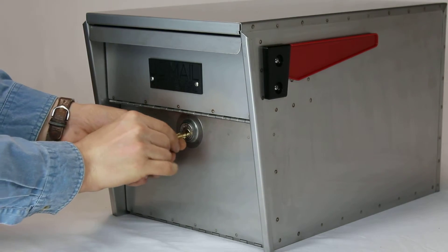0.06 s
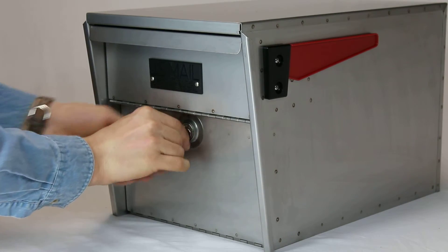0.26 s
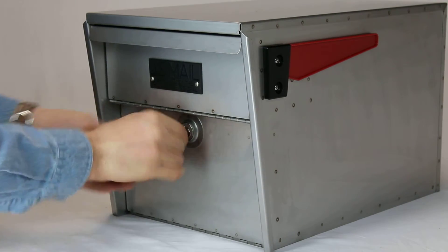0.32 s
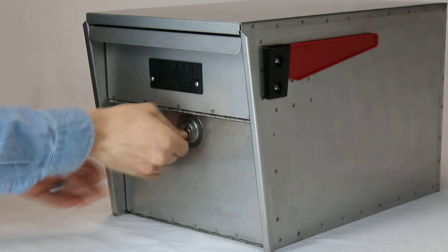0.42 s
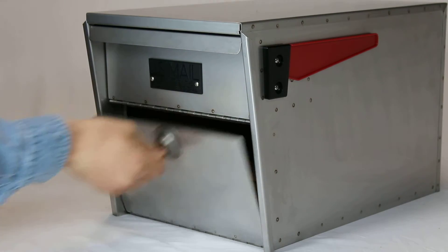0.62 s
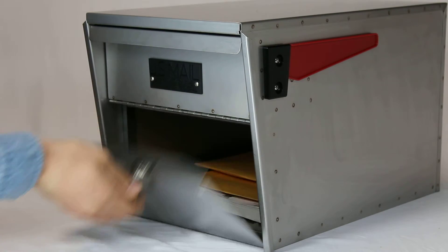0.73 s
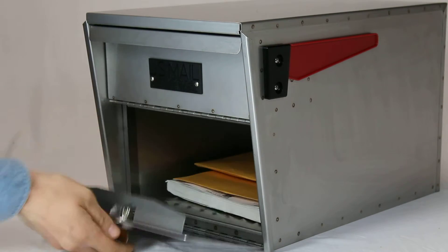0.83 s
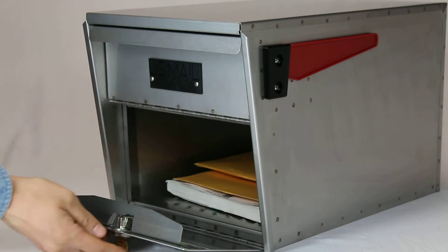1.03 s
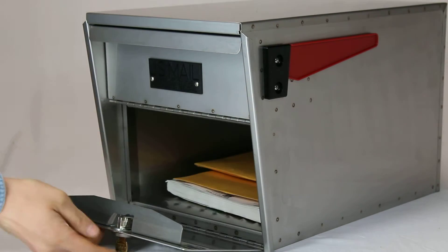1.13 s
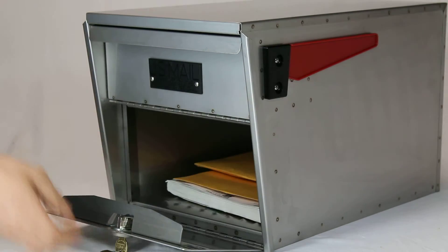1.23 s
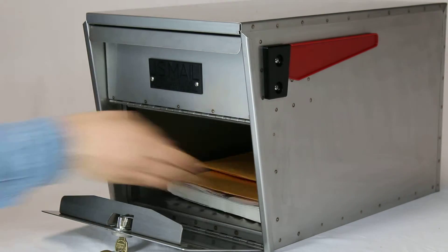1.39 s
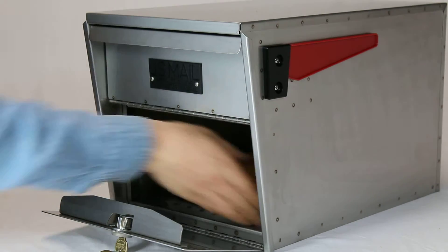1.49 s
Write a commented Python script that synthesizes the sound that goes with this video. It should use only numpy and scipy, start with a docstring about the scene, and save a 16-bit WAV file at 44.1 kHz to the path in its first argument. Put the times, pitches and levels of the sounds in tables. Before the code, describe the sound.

Metal mailbox unlocking with clicks and a boom, its door dropping open with a clunk.

```python
"""A room with a low hum, the microphone close to a sheet-metal mailbox. A key seats and turns:
pins tick, the cam scrapes and lets go, and the thin panels of the box boom and ring.
The door swings down on a rubbing hinge and clunks on its stop, shaking the table beneath.
The hanging keys jingle and knock against the door, and a sleeve brushes into the opening."""
import sys
import numpy as np
from scipy import signal
from scipy.fft import rfft, irfft, next_fast_len
from scipy.io import wavfile

SR = 44100
rng = np.random.default_rng(int(sys.argv[2]) if len(sys.argv) > 2 else 0)


def pcm_store(signal):
    """Save signal as 16-bit PCM."""
    levels = np.round(np.clip(np.atleast_2d(signal), -1, 1) * 32767)
    wavfile.write(sys.argv[1], SR, levels.astype(np.int16).T)


N = 68355
T = np.arange(N) / SR
CRACK_S, CONTACT_S = 0.002, 0.0013  # decay of a metal crack; rise of a ring after hard contact


def undb(db):
    """Decibels to gain."""
    return 10 ** (np.asarray(db) / 20)


def along(points, hz):
    """Read (pitch_hz, value) points on a log-frequency axis."""
    pitches, values = np.array(points, float).T
    return np.interp(np.log(np.maximum(hz, 1)), np.log(pitches), values)


def fader(points):
    """Gain over time from (time_s, level_db) points, silent before the first."""
    times, db = np.array(points, float).T
    return undb(np.interp(T, times, db)) * (T >= times[0])


def colour(x, points):
    """Causal filter through (pitch_hz, gain_db) points."""
    size = 2 * next_fast_len(N)
    hz = np.arange(size // 2 + 1) * SR / size
    cepstrum = irfft(np.log(undb(along(points, hz))))
    cepstrum[1:size // 2] *= 2  # fold to minimum phase
    cepstrum[size // 2 + 1:] = 0
    return irfft(rfft(x, size) * np.exp(rfft(cepstrum)))[:N]


def at(start_s, x):
    """Delay a sound to its start."""
    return np.concatenate([np.zeros(int(start_s * SR)), x])[:N]


def fade(t60):
    """Decay by 60 dB in t60 seconds."""
    return np.exp(-np.log(1000) * T / t60)


def noise():
    """White noise of unit level."""
    return rng.standard_normal(N)


def ring(modes, swell_s, tilt_db=0):
    """Decaying modes that build up over swell_s, tilted by tilt_db per octave from the first."""
    rise = np.sin(np.pi / 2 * np.minimum(T / swell_s, 1))
    out = 0
    for hz, db, t60 in modes:
        gain = undb(db + tilt_db * np.log2(hz / modes[0][0]))
        out += gain * fade(t60) * np.sin(2 * np.pi * hz * T)
    return rise * out


def thumps(pushes, modes, focus_db_per_octave=10):
    """Pushes into one body; the spot that is pushed favours the modes near one pitch."""
    out = 0
    for start_s, level_db, swell_s, pitch_hz in pushes:
        favoured = [(hz, db - focus_db_per_octave * abs(np.log2(hz / pitch_hz)), t60)
                    for hz, db, t60 in modes]
        out += undb(level_db) * at(start_s, ring(favoured, swell_s))
    return out


def stick_slip(slips_per_s):
    """Friction: tiny clicks at random times, each with a short tail."""
    slips = (rng.random(N) < slips_per_s / SR) * np.sign(noise())
    click = noise() * (np.exp(-T / CRACK_S) + undb(-10.5) * fade(t60=0.18))
    friction = signal.fftconvolve(slips, click)[:N]
    return friction / friction.std()


# Hum in the room: pitch_hz, level_db
HUM_TONES = [(45.6, -51), (91.2, -44)]
# Air around the microphone: pitch_hz, gain_db
AIR_COLOUR = [(25, -24.5), (115, -25), (190, -36), (500, -33.5), (1000, -47.5), (2500, -47), (5000, -51.5),
              (9000, -56), (12000, -65)]
def room_tone():
    """A steady low hum and soft air noise lie behind everything."""
    hum = sum(undb(db) * np.sin(2 * np.pi * (hz * T + rng.random())) for hz, db in HUM_TONES)
    return np.sqrt(2) * hum + colour(noise(), AIR_COLOUR)


# Cloth entering the opening: time_s, level_db
SLEEVE_LEVELS = [(1.38, -70), (1.47, -51.5), (1.55, -45)]
# Its hiss: pitch_hz, gain_db
CLOTH_COLOUR = [(200, -7), (1000, 10), (3000, 1), (8000, -5.5), (11000, -10), (15000, -38)]
def sleeve():
    """Cloth brushes into the box with a faint, growing hiss."""
    return colour(noise() * fader(SLEEVE_LEVELS), CLOTH_COLOUR)


# Jolt into the table: start_s, level_db, swell_s, pitch_hz
TABLE_JOLTS = [(0.895, -24.5, 0.0062, 30)]
# The table's rumble: pitch_hz, level_db, t60_s
TABLE_RING = [(27, -11, .4), (42, -6.5, 0.95), (63, 7, 0.24)]
def table_shudder():
    """The table shudders in its deep modes under the door."""
    return thumps(TABLE_JOLTS, TABLE_RING)


# Rub of the hinge: time_s, level_db
HINGE_LEVELS = [(.76, -51), (.82, -42.5), (.86, -38), (.95, -39), (1.0, -46.5), (1.04, -82)]
# Its tone: pitch_hz, gain_db
RUB_COLOUR = [(60, -18), (250, 8.5), (900, 8), (1800, 3.5), (4500, -9), (9000, -13), (15000, -39)]
def hinge():
    """The hinge sticks and slips as the door swings down."""
    return colour(stick_slip(slips_per_s=820) * fader(HINGE_LEVELS), RUB_COLOUR)


# Faint tone of the open door: time_s, pitch_hz, level_db
FLEX_GLIDE = [(.92, 675, -62), (1.12, 771, -46), (1.28, 737, -56), (1.5, 737, -65)]
def flexing_door():
    """One thin ring of the door slides in pitch as the sheet bends."""
    times, hz, db = np.array(FLEX_GLIDE, float).T
    phase = 2 * np.pi * np.cumsum(np.interp(T, times, hz)) / SR
    return fader(list(zip(times, db))) * np.sin(phase)


# The door landing and settling: start_s, level_db, swell_s, pitch_hz
DOOR_LANDINGS = [(0.8690, -19.5, 0.0088, 375), (0.912, -26.5, 0.016, 112), (1.078, -23, 0.0073, 238)]
# The door's own ring: pitch_hz, level_db, t60_s
DOOR_RING = [(112, 6.5, 0.27), (140, -3, 0.97), (238, -5, 0.33), (361.8, 4.5, 0.15), (419, -1, 0.206),
             (579, -5, 0.18), (993, -2, 0.24), (1092, -1, 0.18), (1327, 8.5, 0.1)]
def door_stop():
    """The door clunks on its stop; its broad edge drives only a narrow range of modes."""
    return thumps(DOOR_LANDINGS, DOOR_RING, focus_db_per_octave=17)


# The key bunch hitting the door: start_s, level_db
KEY_KNOCKS = [(1.011, -11), (1.237, -16.5)]
# Its dull clack: pitch_hz, gain_db
CLACK_COLOUR = [(130, -14), (260, -5.5), (450, 0.5), (700, -6), (950, 3.5), (1320, -3), (1600, -2),
                (2300, -8.5), (2950, -15.5), (3600, -28), (8000, -34), (15000, -52)]
def knocking_keys():
    """The hanging bunch knocks on the door, which rings under each knock."""
    envelope = undb(-4.5) * np.exp(-T / 0.0039) + undb(-4) * fade(t60=0.35)  # crack, then tail
    clacks = sum(undb(db) * at(start_s, noise() * envelope) for start_s, db in KEY_KNOCKS)
    ring_db, favoured_hz = -12, 650
    pushes = [(start_s, db + ring_db, CONTACT_S, favoured_hz) for start_s, db in KEY_KNOCKS]
    return colour(clacks, CLACK_COLOUR) + thumps(pushes, DOOR_RING)


# Jingles of the bunch: start_s, level_db, tilt_db_per_octave, t60_factor
KEY_JINGLES = [(0.797, -46.5, 1, .8), (0.881, -48.5, -17, 2.2), (1.015, -57, 18, 1.1),
               (1.24, -34.5, -79, .6)]
# One key's ring: pitch_hz, level_db, base_t60_s
KEY_RING = [(7960, -8, 0.12), (8340, 1, 0.2), (9460, -6, 0.39), (11675, -4.5, 0.14), (14705, -6, 0.17)]
def jingling_keys():
    """A ringing key beats against a quieter one, slightly out of tune with it."""
    swell_s, detune_hz, twin_db = 0.009, (17.4, 54), -15
    out = 0
    for start_s, level_db, tilt_db, t60_factor in KEY_JINGLES:
        key = [(hz, db, t60 * t60_factor) for hz, db, t60 in KEY_RING]
        twin = [(hz + rng.uniform(*detune_hz), db + twin_db, t60) for hz, db, t60 in key]
        pair = ring(key, swell_s, tilt_db) - ring(twin, swell_s, tilt_db)
        out += undb(level_db) * at(start_s, pair)
    return out


# Ticks of pins and hinge: start_s, level_db, low_cut_hz
SMALL_TICKS = [(0.0768, -31, 7040), (0.1090, -28, 1500), (0.1202, -25, 5000), (0.1745, -28.5, 7400),
               (0.1914, -26, 5000), (0.207, -29.5, 7400), (0.8370, -40, 7200), (0.8725, -38, 3940),
               (0.906, -30, 8000), (0.962, -42, 3500), (1.2406, -40, 5000)]
# Small metal parts at close range: pitch_hz, gain_db
PIN_COLOUR = [(2000, -3), (3200, 6.5), (5500, -6.5), (8000, 3.5), (10500, -5), (12000, -8.5), (15000, -15)]
def ticks():
    """Small hard parts snap home, each with a sharp peak and a brief tail."""
    peak_s = 0.00056
    envelope = T / peak_s * np.exp(1 - T / peak_s) + undb(-8) * fade(t60=0.1)
    out = 0
    for start_s, level_db, low_cut_hz in SMALL_TICKS:
        low_cut = signal.butter(2, low_cut_hz, "high", fs=SR, output="sos")
        tick = signal.sosfilt(low_cut, np.sign(noise()) * envelope)
        out += undb(level_db) * at(start_s, tick)
    return colour(out, PIN_COLOUR)


# The cam dragging on the frame: time_s, level_db
CAM_LEVELS = [(.10, -30.5), (.17, -21.5), (.21, -16.5), (.232, -8.5), (.255, -5), (.29, -15), (.32, -25),
              (.36, -44)]
# Its rasp: pitch_hz, gain_db
CAM_COLOUR = [(100, -53.5), (200, 0.5), (450, 5.5), (600, -6), (1400, -8.5), (2700, -10.5), (4300, -22.5),
              (6000, -21.5), (9000, -37), (15000, -45)]
# The key grating on the pins: time_s, level_db
GRIT_LEVELS = [(.13, -51), (.18, -48), (.21, -34.5), (.243, -27), (.256, -33.5), (.28, -76)]
# The cam's chirp, then the latch's ping: pitch_hz, level_db, t60_s
SQUEAK_MODES = [(5840, -0.29, 0.056), (5930, -1.8, 0.07)]
LATCH_MODES = [(854, -3, 0.44), (3500, -15, 0.066)]
def turning_lock():
    """The key grates in the barrel, the cam drags and chirps as it bites, and the latch snaps free."""
    grit = colour(stick_slip(slips_per_s=170) * fader(GRIT_LEVELS), PIN_COLOUR)
    cam = colour(stick_slip(slips_per_s=820) * fader(CAM_LEVELS), CAM_COLOUR)
    squeak = undb(-29.5) * at(0.2215, ring(SQUEAK_MODES, CONTACT_S))
    latch = undb(-33) * at(0.467, ring(LATCH_MODES, CONTACT_S))
    return grit + cam + squeak + latch


# Pushes that flex the box: start_s, level_db, swell_s, pitch_hz
BOX_PUSHES = [(0.022, -18, 0.05, 116), (0.208, -11, 0.061, 172), (0.256, -5, 0.039, 117),
              (0.475, -26.5, 0.029, 118)]
# Its boom from close by: pitch_hz, level_db, t60_s
BOX_RING = [(121, 4.5, 0.25), (160, 1, 0.15), (275, -3.5, 0.22), (310, 2.5, 0.2), (456.7, 10, 0.2)]
def booming_box():
    """The box flexes and booms in its low modes as the key seats and turns."""
    return thumps(BOX_PUSHES, BOX_RING)


# Decay of the rattle in the box: pitch_hz, t60_s
RATTLE_DECAY = [(300, 0.85), (1000, 0.54), (2800, 0.26), (6000, 0.19), (13000, 0.085)]
def rattle():
    """Countless overlapping modes; the higher half-octave bands die away sooner."""
    spectrum, hz = rfft(noise()), np.arange(N // 2 + 1) * SR / N
    bands = np.round(2 * np.log2(np.clip(hz, 180, 16000)))
    return sum(irfft(spectrum * (bands == band), N) * fade(along(RATTLE_DECAY, 2 ** (band / 2)))
               for band in np.unique(bands))


# Bands that shape each blow: pitch_hz
BANDS_HZ = (400, 900, 1500, 3200, 5000, 9000, 13000)
# Key, cam, latch and door striking the box: start_s, crack_db, ring_db, then gain_db for each band
METAL_BLOWS = [(0.02, 8, -37, -9.5, -30, -24, -26, -29, -33, -46),
               (0.2460, 11.5, -26, -5.5, -11, -10.5, -17.5, -34.5, -27.5, -43),
               (0.4670, 11.5, -38.5, -19, -17, -25.5, -20.5, -37.5, -38, -50),
               (0.6800, -17, -71, -22.5, -34, -36, -37.5, -43, -54, -58),
               (0.88, 8, -45, -12.5, -23.5, -26.5, -26, -29.5, -33.5, -54),
               (1.079, 4, -60, -18.5, -24, -25.5, -30.5, -36.5, -44, -56)]
# Main modes of the panels: pitch_hz, level_db, t60_s
PANEL_RING = [(181, -25, 0.72), (268.4, -2.5, 1.3), (309.2, 4, 0.21), (356.3, -1, 1.84), (442, 1, 0.7),
              (648, -7, 0.99), (662, -11, 2.2), (755.4, -13.5, 1.34), (807, -9, 1.14), (873, -16, 0.47)]
# Wash of lesser panel modes: pitch_hz, gain_db
PANEL_SHIMMER = [(190, -21), (300, 4.5), (500, -7), (750, 8.5), (1100, 2), (1800, -7.5), (3000, -15),
                 (6000, -55)]
def metal_blows():
    """Metal on metal: a bright crack, a rattling tail, and the long ring of the panels."""
    panels = sum(ring([(hz, db, t60)], swell_s=0.16 * t60) for hz, db, t60 in PANEL_RING)
    out = 0
    for start_s, crack_db, ring_db, *band_db in METAL_BLOWS:
        crack = colour(noise() * np.exp(-T / CRACK_S), [(1200, -32.5), (3200, 0.5)])
        bass = [(50, band_db[0] - 77), (110, band_db[0] + 3), (260, band_db[0] - 4)]
        hit = colour(undb(crack_db) * crack + rattle(), bass + list(zip(BANDS_HZ, band_db)))
        shimmer = colour(noise() * fade(t60=1.66), PANEL_SHIMMER)
        out += at(start_s, hit + undb(ring_db) * (panels + shimmer))
    return out


# Resonances of the thin sheet: pitch_hz, gain_db, t60_s
SHEET_RESONANCES = [(747, -1.5, 0.066), (1038, -3.5, 0.19), (1389, -1.5, 0.14), (1825, 2.5, 0.26),
                    (2620, 4.5, 0.47), (2805, 4.5, 0.15)]
def resonating_sheet(drive):
    """The thin sheet rings in answer to the metal sounds that drive it."""
    response = 0
    for hz, db, t60 in SHEET_RESONANCES:
        unit_gain = 2 * np.log(1000) / (t60 * SR)  # 0 dB at the resonance
        response += undb(db) * unit_gain * fade(t60) * np.cos(2 * np.pi * hz * T)
    return signal.fftconvolve(drive, response)[:N]


def scene():
    """Lock, box, door, keys and sleeve, close to one microphone over the room tone."""
    metal = metal_blows() + ticks() + turning_lock() + hinge() + knocking_keys() + jingling_keys()
    body = booming_box() + door_stop() + table_shudder() + flexing_door()
    return (metal + resonating_sheet(metal) + body + sleeve() + room_tone())[None]


# Treble response of the microphone: pitch_hz, gain_db
MIC_RESPONSE = [(12000, -0.5), (14500, -9), (15800, -17)]
def record(dry):
    """The microphone softens the highest treble and the recorder cuts the top."""
    top_hz = 15600
    low_pass = signal.ellip(8, .2, 70, top_hz, fs=SR, output="sos")
    return signal.sosfilt(low_pass, colour(dry[0], MIC_RESPONSE))[None]


dry = scene()
out = record(dry)
pcm_store(out)
```